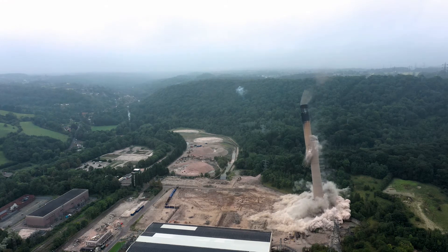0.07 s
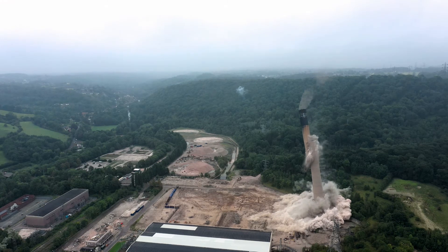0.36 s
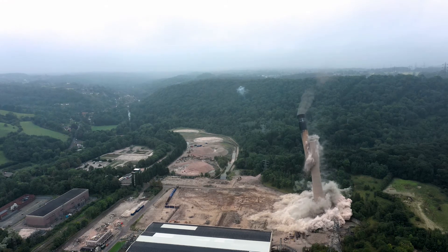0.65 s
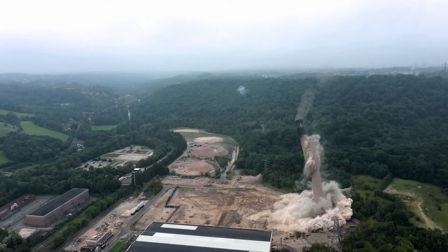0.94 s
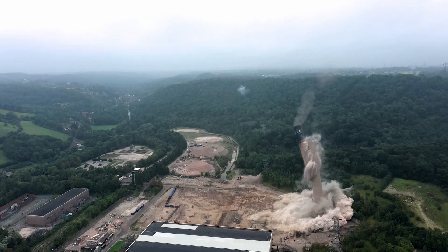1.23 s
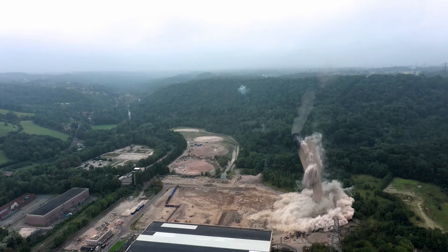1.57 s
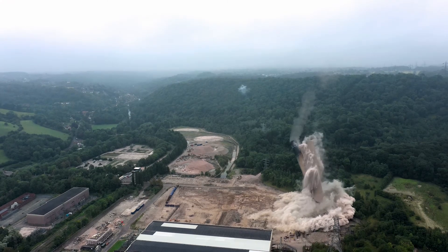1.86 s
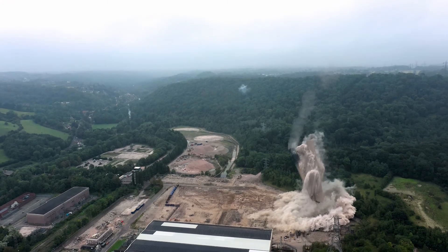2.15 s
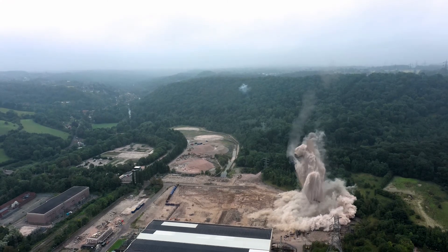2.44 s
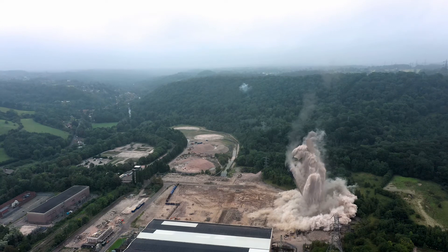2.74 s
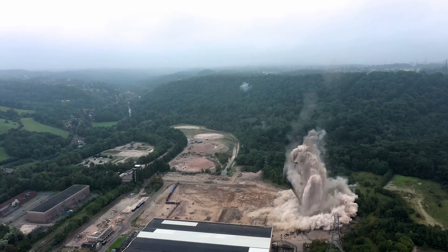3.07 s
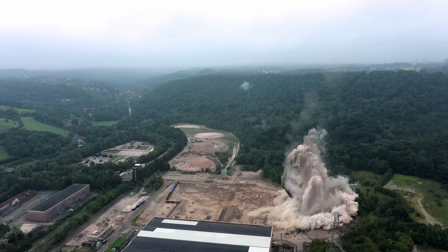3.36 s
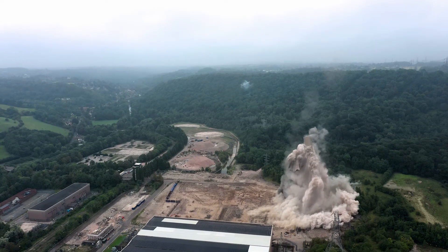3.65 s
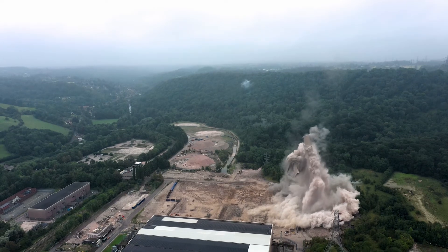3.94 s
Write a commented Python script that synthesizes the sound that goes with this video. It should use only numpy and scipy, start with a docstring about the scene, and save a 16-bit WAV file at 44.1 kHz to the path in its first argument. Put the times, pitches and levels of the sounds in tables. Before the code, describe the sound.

A tall concrete chimney collapses far off in a low roar, with heavy thuds and dull cracks through the first 1.5 seconds. The roar then ebbs while rubble keeps clattering and grit hisses, with a few more cracks from 2.3 to 3 seconds. At about 3.5 seconds a boom starts a louder surge that builds until the end at 4 seconds. Wind gusts rumble on the microphone throughout.

```python
"""A low roar with cracks, clattering rubble and hissing grit: a tall concrete chimney collapses far off.
The roar ebbs, then a boom starts a louder surge that grows brighter. Wind rumbles at the microphone,
in the open air, and a few very faint high whistles pass. Falling masonry is band-limited noise, heavy
landings are sagging low tones, breaks are noise bursts, and debris is a filtered rain of clicks."""
import sys
import numpy as np
from scipy import signal
from scipy.fft import rfft, irfft
from scipy.io import wavfile
from scipy.ndimage import uniform_filter1d

SR = 44100
rng = np.random.default_rng(int(sys.argv[2]) if len(sys.argv) > 2 else 0)


def wav_out(sig):
    """Save sig, one row per channel (or a flat mono array), as 16-bit PCM at SR to the path in sys.argv[1]."""
    wavfile.write(sys.argv[1], SR, np.round(np.clip(np.atleast_2d(sig).T, -1, 1) * 32767).astype(np.int16))


N = 176400
T = np.arange(N) / SR
BIN_HZ = np.fft.rfftfreq(N, 1 / SR)


def amp(db):
    """Decibels to gain."""
    return 10 ** (np.asarray(db) / 20)


def unit_rms(x):
    """Scales x to rms 1."""
    return x / np.sqrt(np.mean(x ** 2) + 1e-20)


def curve(table, t=T):
    """Each column after the first, interpolated linearly in time."""
    times_s, *columns = np.transpose(table)
    return [np.interp(t, times_s, column) for column in columns]


def coloured(x, colour):
    """Filters x by (f/Hz, gain/dB) points; rms 1."""
    hz, db = np.transpose(colour)
    gain = amp(np.interp(np.log(BIN_HZ + 1), np.log(hz), db))
    return unit_rms(irfft(rfft(x) * gain, N))


def resonance(x, hz, half_width_hz):
    """Rings x in one mode; rms 1."""
    return unit_rms(irfft(rfft(x) / (1 + 1j * (BIN_HZ - hz) / half_width_hz) ** 2, N))


def drift(rate_hz):
    """Random motion up to about rate_hz; rms 1."""
    return unit_rms(irfft(rfft(rng.standard_normal(N)) * np.exp(-(BIN_HZ / rate_hz) ** 2), N))


def impacts(per_s=1800, spread_db=0.5):
    """Random rain of clicks of uneven size; rms 1."""
    size = amp(spread_db * np.minimum(rng.exponential(1, N), 4))
    return unit_rms(size * rng.choice([-1, 1], N) * (rng.random(N) < per_s / SR))


def steadied(x, span_s):
    """Evens out swells longer than span_s, keeping the quick flutter."""
    size = max(int(span_s * SR), 2)
    return x / np.sqrt(uniform_filter1d(uniform_filter1d(x ** 2, size), size) + 1e-12)


def roar():
    """Countless dull blows merge into a rumble; its upper edge climbs in the last surge."""
    # falling mass: t/s, level/dB, upper edge f/Hz
    contour = [(0, -25, 224), (.18, -26.5, 222), (.32, -27, 215), (.42, -21, 195), (.52, -23.5, 186),
               (.62, -27, 215), (.71, -27.5, 215), (.78, -22.5, 215), (.86, -23, 225), (.99, -26.5, 210),
               (1.1, -24.5, 212), (1.38, -27, 218), (1.52, -30.5, 220), (2.0, -36, 218), (2.55, -35, 208),
               (2.95, -36.5, 236), (3.43, -37.5, 215), (3.5, -29, 145), (3.58, -32, 180),
               (3.65, -26.5, 190), (3.72, -22, 178), (3.8, -20, 192), (3.88, -18.5, 203), (3.95, -19, 208),
               (4.0, -15, 255)]
    low_hz, hump_db, hump_octaves = 61, 3, 0.091
    hz, frames_s, spectrum = signal.stft(rng.standard_normal(N), SR, nperseg=2048, noverlap=1536)
    hz = hz[:, None] + 1
    edge_hz = curve(contour, frames_s)[1]
    passband = ((1 + (low_hz / hz) ** 8) * (1 + (hz / edge_hz) ** 7.98)) ** -.5  # 24 dB/octave skirts
    edge_hump = amp(hump_db * np.exp(-(np.log2(hz / edge_hz) / hump_octaves) ** 2))
    rumble = signal.istft(spectrum * passband * edge_hump, SR, nperseg=2048, noverlap=1536)[1][:N]
    return amp(curve(contour)[0]) * steadied(unit_rms(rumble), span_s=0.04)


def rubble():
    """Blocks and stones clatter in clumps under a hiss of falling gravel and grit."""
    # clatter: t/s, block level/dB, stone level/dB
    clatter_levels = [(0, -40.5, -55), (.22, -46.5, -52), (.3, -43.5, -51.5), (.45, -44, -43),
                      (.55, -42, -49.5), (.66, -39, -44), (.78, -37.5, -45.5), (.93, -41, -49),
                      (1.08, -44, -43), (1.5, -42.5, -46.5), (1.78, -46, -46), (1.98, -43.5, -51),
                      (2.2, -41.5, -46.5), (2.4, -44.5, -42.5), (2.6, -41.5, -44), (2.8, -39.5, -44.5),
                      (3.1, -42, -45), (3.4, -44.5, -50), (3.7, -41.5, -48.5), (3.88, -42, -48),
                      (4.0, -39, -42.5)]
    # hiss: t/s, grit level/dB, gravel level/dB
    hiss_levels = [(0, -59, -57), (.24, -62.5, -71.5), (.28, -59, -58), (.35, -58, -59),
                   (.43, -54.5, -54.5), (.55, -54.5, -57), (.63, -54.5, -56), (.77, -51.5, -49.5),
                   (.9, -52.5, -56), (1.1, -50.5, -54), (1.3, -52.5, -56.5), (1.45, -52, -52.5),
                   (1.92, -55, -57), (2.45, -52, -52), (2.85, -53, -51.5), (3.35, -52, -53),
                   (3.85, -54, -53), (4.0, -54, -52.5)]
    # impact spectra by debris size: f/Hz, gain/dB
    block_colour = [(150, -9), (300, 3.5), (430, -2.5), (560, 0), (680, -3), (850, -16), (1300, -30.5),
                    (4000, -50.5), (8000, -72)]
    stone_colour = [(150, -22.5), (400, -15.5), (600, 2.5), (760, 4.5), (900, 0), (1100, -7.5), (1300, -28),
                    (2000, -27), (4000, -49.5), (8000, -76)]
    gravel_colour = [(400, -9), (1100, 2), (1400, -1.5), (1750, -0.5), (2050, -4), (2600, -16.5),
                     (4000, -29), (8000, -57.5)]
    grit_colour = [(400, -14.5), (1000, 0), (1650, -6), (2020, -4.5), (2300, 0.5), (2650, -1), (3200, -4.5),
                   (3800, -10.5), (4400, -18.5), (5700, -23.5), (6600, -34.5), (12000, -52.5)]
    block_db, stone_db = curve(clatter_levels)
    grit_db, gravel_db = curve(hiss_levels)
    clumps_db = 0.26 * drift(rate_hz=35)
    blocks = amp(block_db) * steadied(coloured(impacts(), block_colour), span_s=0.11)
    stones = amp(stone_db) * steadied(coloured(impacts(), stone_colour), span_s=0.13)
    grit = amp(grit_db) * coloured(impacts(per_s=7000, spread_db=-1.5), grit_colour)
    gravel = amp(gravel_db) * coloured(impacts(), gravel_colour)
    return amp(clumps_db) * (blocks + stones + gravel + grit)


def wind():
    """Gusts buffet the microphone with a lumpy low rumble."""
    # gusts: t/s, level/dB
    gusts = [(0, -52), (.08, -29.5), (.5, -42.5), (.95, -42), (1.2, -36), (1.45, -44), (1.8, -34.5),
             (2.1, -56), (2.35, -42), (2.6, -42.5), (2.88, -47), (3.1, -47), (3.33, -55), (3.42, -41),
             (3.5, -23), (3.58, -37), (3.65, -24), (3.8, -27.5), (4.0, -27.5)]
    # buffeting spectrum: f/Hz, gain/dB
    colour = [(8, -17), (20, -5.5), (35, 6), (55, 8.5), (90, -14.5), (200, -47), (600, -75.5)]
    return amp(curve(gusts)[0]) * steadied(coloured(rng.standard_normal(N), colour), span_s=0.074)


def air():
    """A very faint high hiss comes and goes over a thin whine."""
    # hiss: t/s, level/dB
    levels = [(0, -69.5), (.12, -75.5), (.35, -80), (.65, -79.5), (.88, -76), (1.15, -77), (1.5, -80),
              (1.75, -79), (1.88, -75), (2.25, -79.5), (2.58, -74.5), (2.8, -74.5), (3.02, -79.5),
              (3.25, -80), (3.33, -75), (3.43, -81), (4.0, -78)]
    # hiss spectrum: f/Hz, gain/dB
    colour = [(3000, 0), (5500, 4), (7300, 2), (8400, 3), (9200, 0.5), (10000, 3.5), (11000, 2), (12200, 0),
              (14000, -7), (16000, -26.5)]
    whine_hz, whine_db = 10000, -93.5
    flicker_db = 1.1 * drift(rate_hz=40)
    hiss = amp(curve(levels)[0] + flicker_db) * coloured(rng.standard_normal(N), colour)
    whine = (1 + drift(rate_hz=60)) * np.sin(2 * np.pi * whine_hz * T)
    return hiss + amp(whine_db) * unit_rms(whine)


def booms():
    """Each heavy section lands as a few low swings of pressure that sag in pitch."""
    # landings: t/s, peak level/dB, mid f/Hz, length/s
    landings = [(.2, -20.5, 139.5, 0.057), (.372, -21, 158.7, 0.058), (0.475, -23.5, 91.9, 0.1),
                (.548, -21.5, 138.8, 0.073), (.62, -21.5, 119, 0.051), (.915, -20, 161.7, 0.045),
                (1.02, -22, 57.8, .09), (1.178, -23, 57.3, 0.065), (1.396, -18.5, 105, 0.039),
                (2.456, -28, 117, 0.049), (2.461, -30, 62.5, 0.077), (3.265, -32.5, 176, 0.057),
                (3.462, -17.5, 62.1, 0.12), (3.49, -30.5, 128.5, 0.089), (3.612, -20, 46, 0.044),
                (3.7, -15.5, 125.4, 0.065), (3.794, -15.5, 120, 0.048), (3.86, -19.5, 193, 0.038),
                (3.925, -16.5, 199.3, 0.061), (3.937, -11, 135.5, 0.041)]
    sag = 0.45  # total drop / mid pitch
    out = np.zeros(N)
    for (start_s, db, hz, length_s), phase in zip(landings, rng.random(len(landings))):
        progress = np.clip((T - start_s) / length_s, 0, 1)
        cycles = hz * length_s * (progress + sag * progress * (1 - progress) / 2)
        out += amp(db) * np.sin(np.pi * progress) * np.sin(2 * np.pi * (cycles + phase))
    return out


def cracks():
    """Concrete breaks: each a dull knock with a longer spray of grit and ringing shards."""
    # breaks: t/s, knock level/dB, knock f/Hz, hold/s, spray gain/dB
    breaks = [(0.246, -35.5, 646, 0.025, -52), (0.365, -38, 660, 0.024, -53), (0.42, -41, 647, .01, -57),
              (0.464, -40, 700, 0.02, -48), (0.512, -50, 700, .006, -52), (0.541, -37.5, 640, 0.029, -52),
              (0.644, -35.5, 437, 0.012, -58), (0.676, -30, 603, 0.0054, -57), (0.723, -36, 600, .018, -55),
              (0.851, -37.5, 400, .012, -65), (0.891, -39, 700, .008, -60), (0.918, -36.5, 560, .008, -61),
              (0.949, -35.5, 710, .006, -68), (1.046, -40.5, 610, 0.02, -50.5), (1.084, -49, 905, .01, -58),
              (1.138, -39.5, 636, 0.033, -57.5), (1.221, -41, 660, 0.017, -52),
              (2.322, -43, 724, 0.022, -59), (2.382, -41, 710, 0.018, -62), (2.46, -40.5, 810, .016, -61),
              (2.668, -40, 700, 0.018, -66), (2.91, -42, 400, 0.018, -60), (3.064, -39.5, 590, 0.036, -63),
              (3.935, -39, 520, .015, -61), (3.974, -33.5, 560, .025, -50.5)]
    # knock spectrum: multiple of knock pitch, gain/dB
    knock_colour = [(.2, -27.5), (.55, -16), (.82, -1.5), (1, 3), (1.25, -5), (1.6, -20.5), (3, -35),
                    (12, -81)]
    # grit spray spectrum: f/Hz, gain/dB
    spray_colour = [(400, -11), (1200, 3), (2000, -5), (2400, -4), (2750, -1), (3200, -4), (4200, -22.5),
                    (6500, -39.5), (12000, -67.5)]
    # shard modes: f/Hz, half-width/Hz, level within the spray/dB
    shard_modes = [(1090, 47, -8.5), (1610, 110, -14.5), (2273, 60, -9), (2412, 61, -8), (2644, 80, -15)]
    rise_s, knock_t60_s, spray_t60_s = .006, .1, .18
    spray = amp(-1.5) * coloured(rng.standard_normal(N), spray_colour)
    for hz, half_width_hz, db in shard_modes:
        spray += amp(db) * steadied(resonance(impacts(), hz, half_width_hz), span_s=.03)
    crumble = rng.standard_normal(N)
    knocks, spray_envelope = np.zeros((2, N))
    for start_s, knock_db, hz, hold_s, spray_db in breaks:
        rise = np.clip((T - start_s) / rise_s, 0, 1)
        decay_s = np.maximum(T - start_s - hold_s, 0)
        colour = [(hz * ratio, db) for ratio, db in knock_colour]
        body = steadied(coloured(crumble, colour), span_s=0.0075)
        knocks += rise * amp(knock_db - 60 * decay_s / knock_t60_s) * body
        spray_envelope += rise * amp(spray_db - 60 * decay_s / spray_t60_s)
    return knocks + spray_envelope * spray


def whistles():
    """Very faint, scratchy high whistles near 10-12 kHz, each one short bend of pitch."""
    # bends: t/s, length/s, start f/Hz, mid f/Hz, end f/Hz, level/dB
    bends = [(.72, .04, 9600, 9900, 10200, -77), (.81, .11, 11800, 12400, 11700, -76.5),
             (.92, .1, 11700, 11200, 11400, -82), (3.62, .22, 9420, 10300, 9240, -84)]
    flutter = np.maximum(.85 + .6 * drift(rate_hz=90), 0)
    waver = 1 + .007 * drift(rate_hz=200)
    out = np.zeros(N)
    for start_s, length_s, start_hz, mid_hz, end_hz, db in bends:
        progress = np.clip((T - start_s) / length_s, 0, 1)
        arch = 4 * progress * (1 - progress)
        hz = start_hz + (end_hz - start_hz) * progress + (mid_hz - (start_hz + end_hz) / 2) * arch
        out += amp(db) * np.sqrt(arch) * flutter * np.sin(2 * np.pi * np.cumsum(hz * waver) / SR)
    return out


def scene():
    """Collapse, wind and faint treble, mono."""
    return (roar() + booms() + rubble() + cracks() + wind() + air() + whistles())[None]


def record(dry):
    """Low-pass band limit with click-free ends."""
    cutoff_hz, fade_s = 15500, .0015
    taps = signal.firwin(511, cutoff_hz, window=("kaiser", 9), fs=SR)
    fades = np.clip(np.minimum(T, T[-1] - T) / fade_s, 0, 1)
    return signal.oaconvolve(dry * fades, taps[None], "same")


dry = scene()
out = record(dry)
wav_out(out)
```